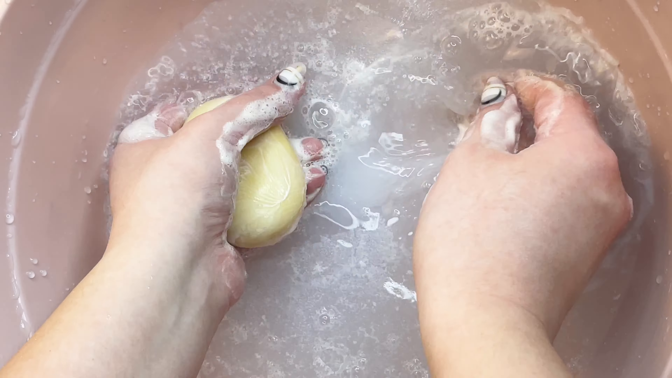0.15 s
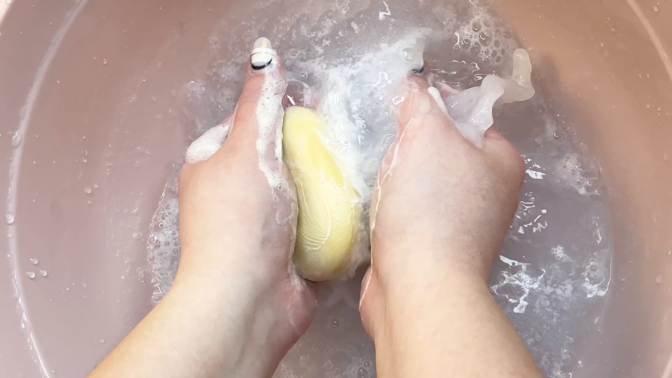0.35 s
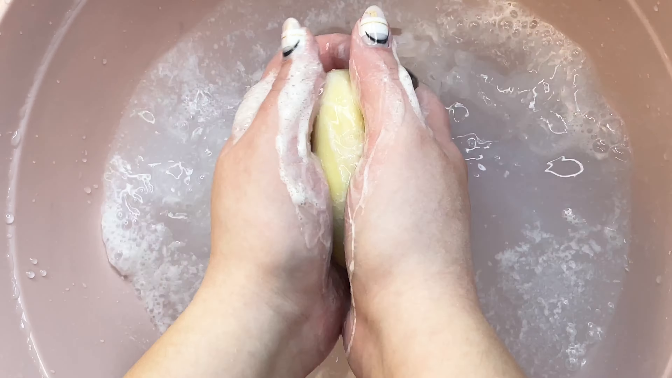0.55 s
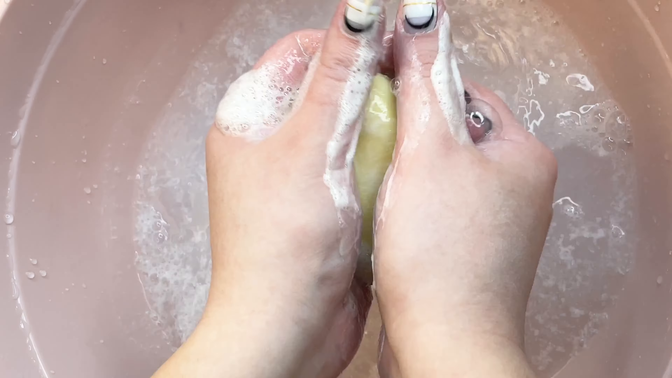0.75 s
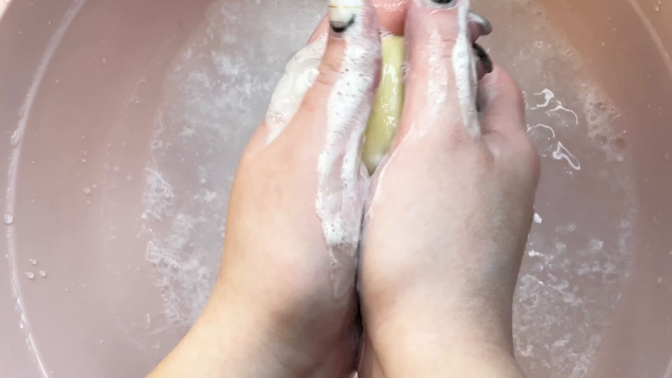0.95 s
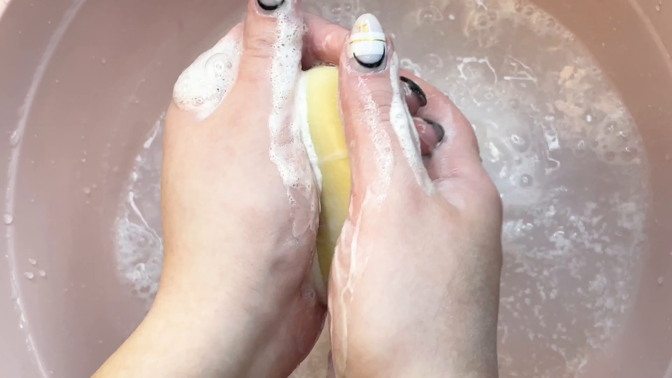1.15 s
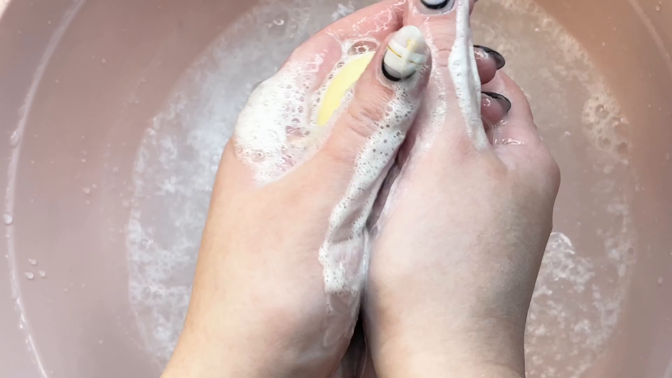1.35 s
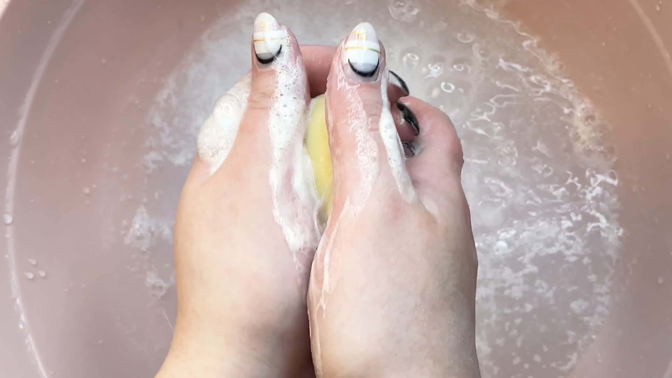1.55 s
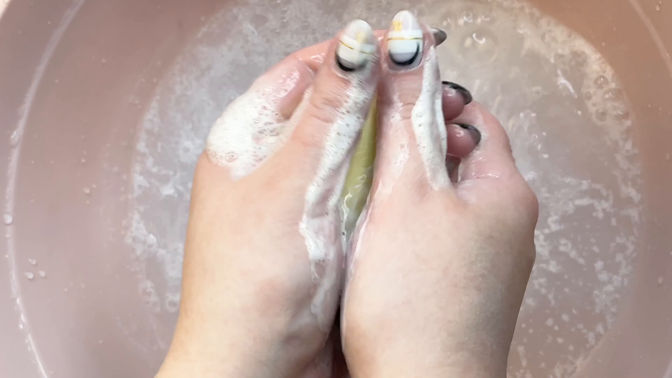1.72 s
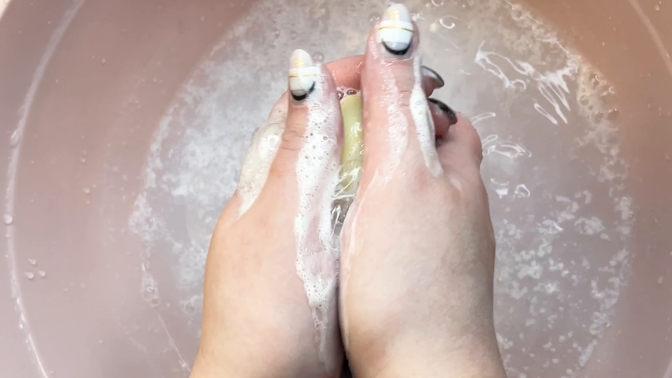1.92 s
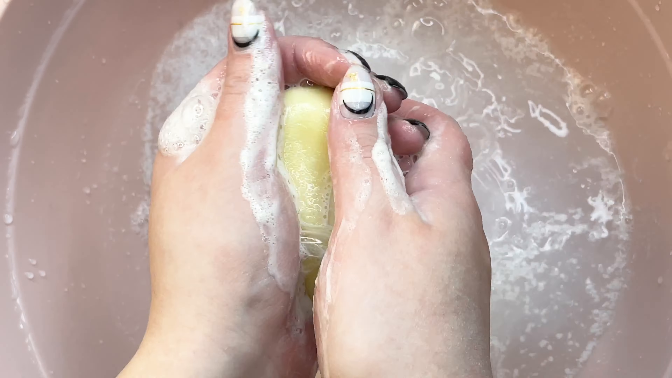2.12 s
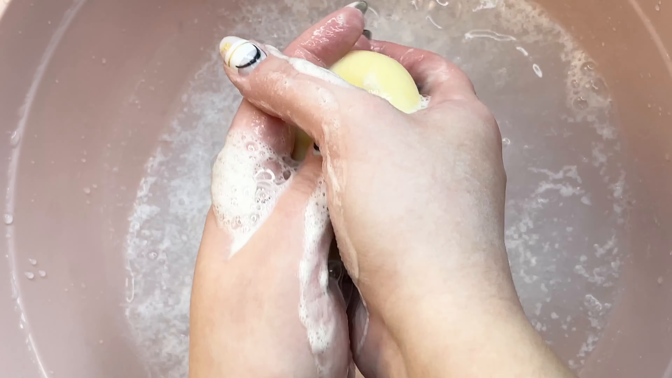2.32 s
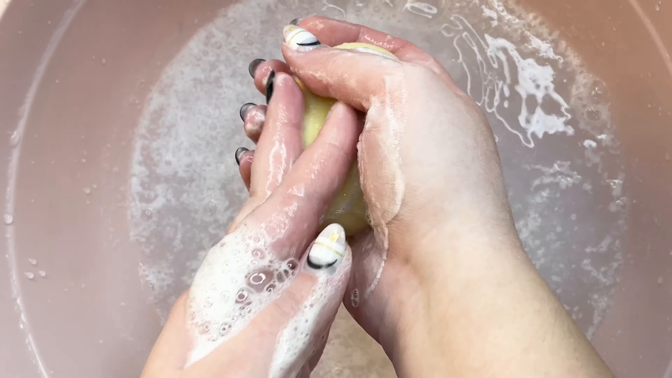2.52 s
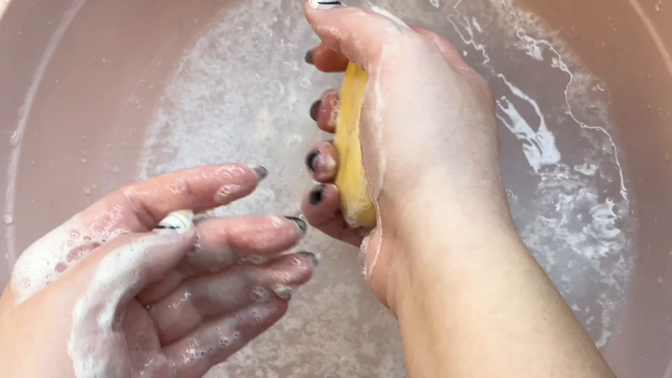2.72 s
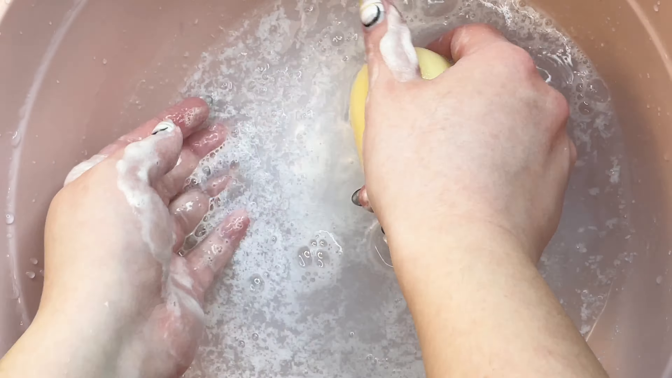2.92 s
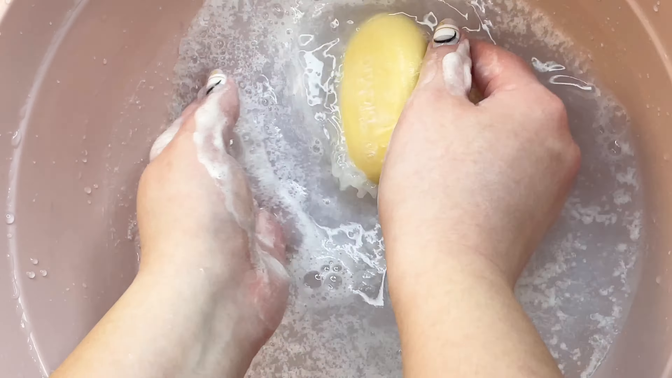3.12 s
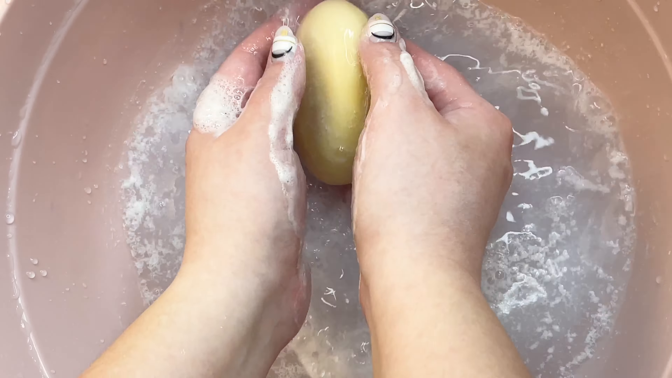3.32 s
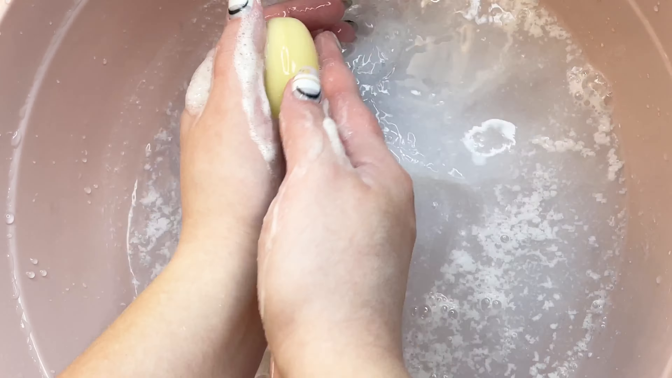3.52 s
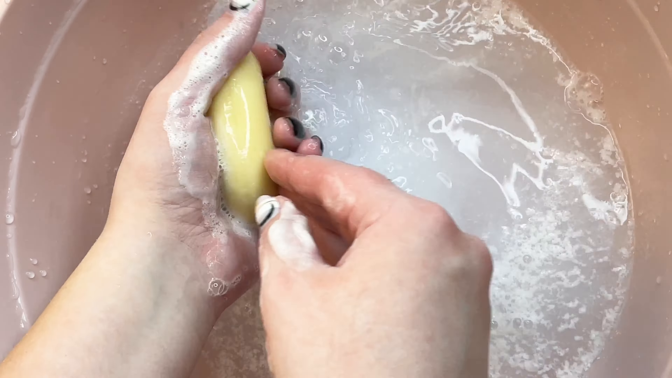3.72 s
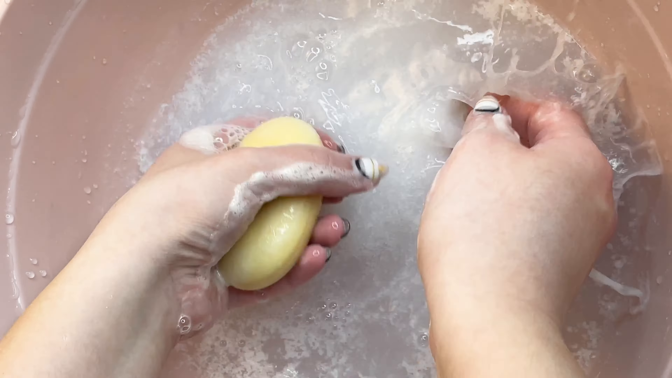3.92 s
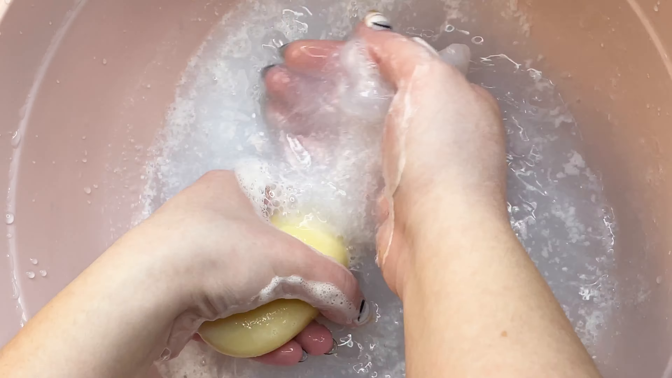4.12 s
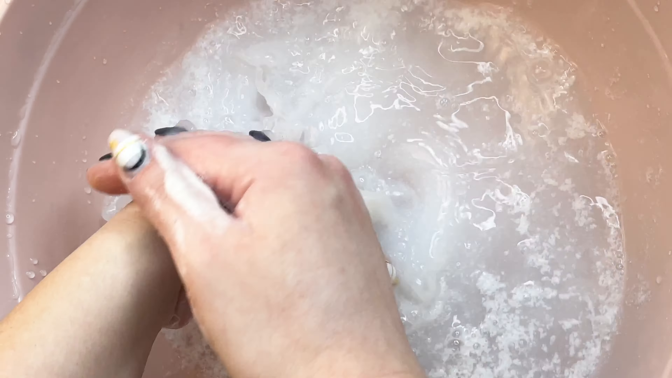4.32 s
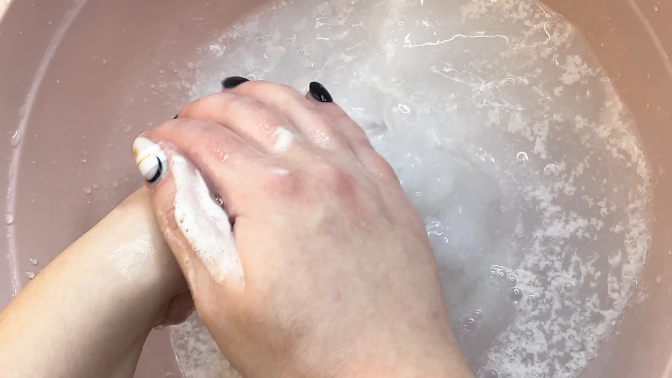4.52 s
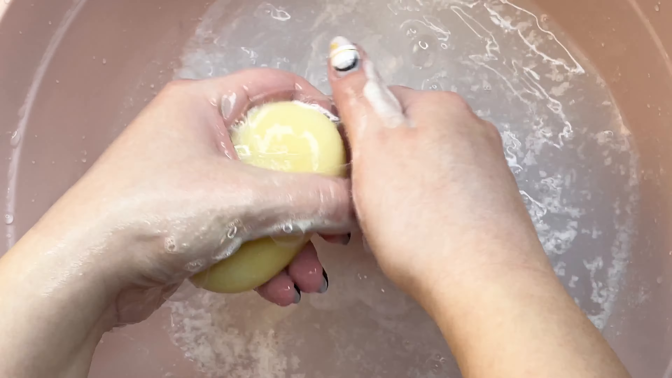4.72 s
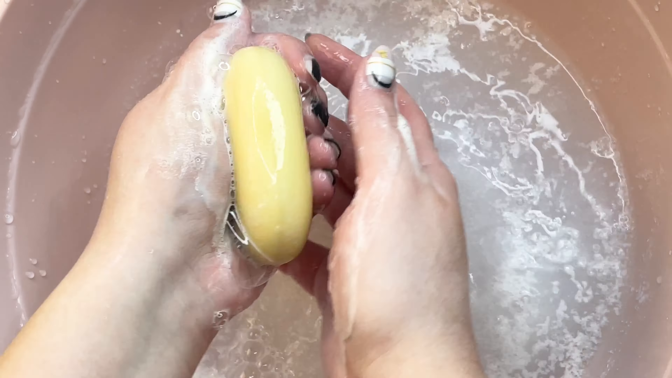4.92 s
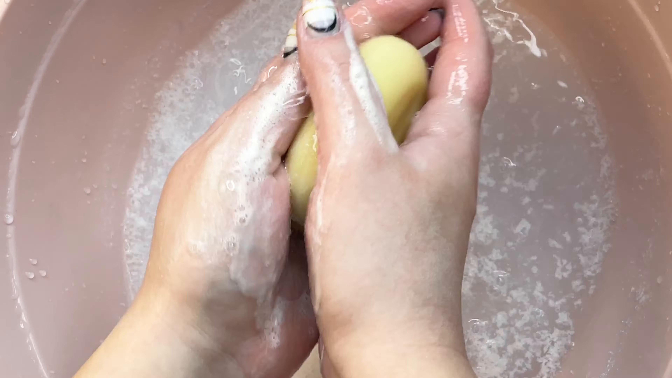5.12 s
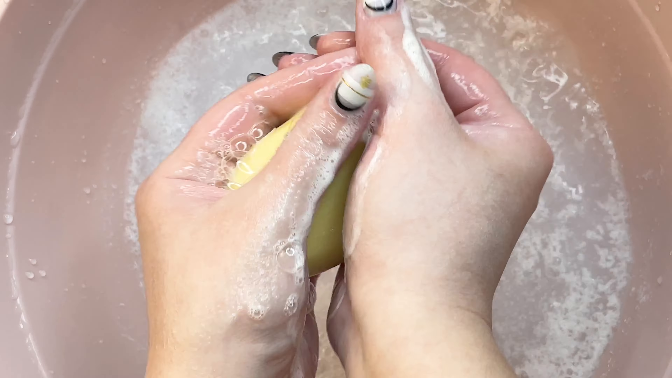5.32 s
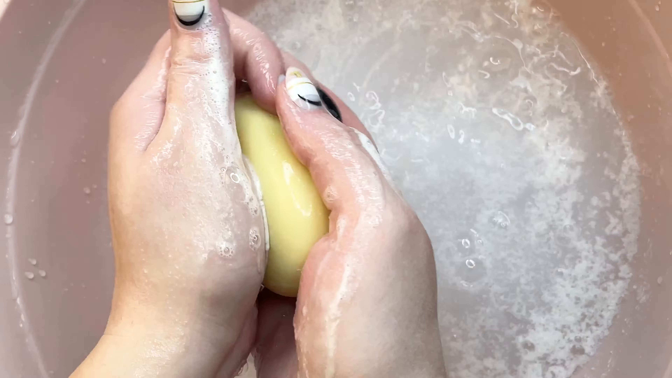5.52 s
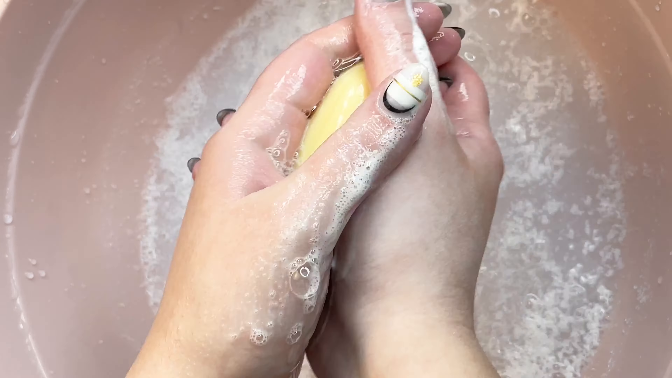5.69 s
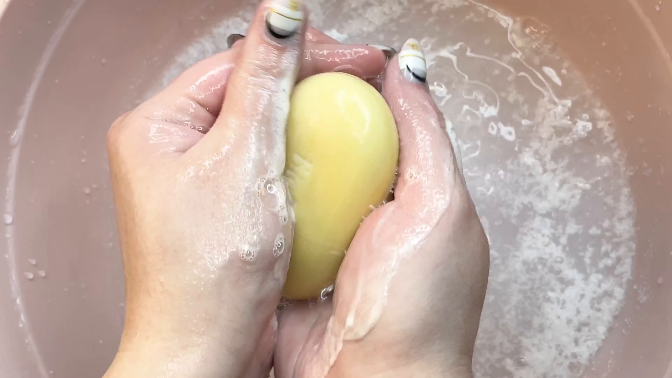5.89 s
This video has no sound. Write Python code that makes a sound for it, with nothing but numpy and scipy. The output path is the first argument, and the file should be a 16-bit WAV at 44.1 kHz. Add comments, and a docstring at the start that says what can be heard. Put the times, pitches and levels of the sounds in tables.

```python
"""Two wet hands turn a soaked bar of soap over a plastic basin of sudsy water, for about six seconds.
For the first second they squeeze briskly: suds squelch and fizz, and air pockets ring, smack and snap.
It then thins out until about 3 s, when a loud plunge rings and sinks to a gulp; another follows near 4 s.
A dense run of squelches and pops follows until 4.8 s, then sparse ones over the fizzing foam.
Throughout, water sloshes, a faint drone wavers, and basin and small room answer into a close stereo mic."""
import sys
import numpy as np
from scipy import signal
from scipy.fft import rfft, irfft, next_fast_len
from scipy.io import wavfile
from scipy.ndimage import uniform_filter1d, map_coordinates

SR = 44100
rng = np.random.default_rng(int(sys.argv[2]) if len(sys.argv) > 2 else 0)


def master_out(mix):
    """Clip the mix to full scale and print it as 16-bit PCM to the path in sys.argv[1]."""
    frames = np.transpose(np.atleast_2d(mix))
    ceiling = np.clip(frames, -1, 1)
    pcm = np.round(ceiling * 32767).astype(np.int16)
    wavfile.write(sys.argv[1], SR, pcm)


N = 262395


def amp(db):
    """Decibels to gain."""
    return 10 ** (np.asarray(db) / 20)


def unit(x):
    """Scale to rms 1."""
    return x / np.sqrt(np.mean(x ** 2) + 1e-20)


def burst(x):
    """Scale a short sound to the energy of 5 ms at rms 1."""
    return x * np.sqrt(.005 * SR / (np.sum(x ** 2) + 1e-20))


def decay(t, t60):
    """An exponential fade that loses 60 dB in t60 seconds."""
    return np.exp(-np.log(1000) * t / t60)


def along(points, hz):
    """Read (Hz, value) points on a log frequency axis."""
    f, v = np.transpose(points)
    return np.interp(np.log(hz + 1), np.log(f), v)


def level_curve(rows):
    """Join (time, level) points into one level per sample."""
    s, level_db = np.transpose(rows)
    return np.interp(np.arange(N) / SR, s, level_db)


def wobble(rate):
    """A smooth random curve, rate knots a second."""
    knots = rng.standard_normal(int(N * rate / SR) + 4)
    return map_coordinates(knots, [np.arange(N) * rate / SR])


def rise_and_fall(s, rise_s, fall_s):
    """An envelope that grows to 1 at s seconds and dies away."""
    t = np.arange(N) / SR - s
    return np.exp(np.minimum(t / rise_s, -t / fall_s))


def filtered(x, response):
    """x times a complex response of frequency."""
    m = next_fast_len(N + SR // 2)
    return irfft(rfft(x, m) * response(np.fft.rfftfreq(m, 1 / SR)), m)[..., :N]


def coloured(x, spectrum):
    """x shaped by a spectrum, at rms 1."""
    return unit(filtered(x, lambda hz: amp(along(spectrum, hz))))


def impulse(spectrum, size=512):
    """The causal impulse response that has this spectrum, by folding its cepstrum."""
    cepstrum = irfft(np.log(amp(along(spectrum, np.fft.rfftfreq(size, 1 / SR)))))
    cepstrum[1:size // 2] *= 2
    cepstrum[size // 2 + 1:] = 0
    return irfft(np.exp(rfft(cepstrum)))


def add(track, s, sound):
    """Mix a sound into the track at s seconds."""
    part = track[max(round(s * SR), 0):][:len(sound)]
    part += sound[:len(part)]


def bubble(t, hz, t60, rise, swell):
    """An air pocket swells for some cycles, then rings out; its pitch has changed by the share rise at t60."""
    glide = 1 + rise * np.minimum(t / t60, 2) / 2
    onset = 1 - np.exp(-(t * hz / swell) ** 2)
    return np.sin(2 * np.pi * hz * t * glide) * decay(t, t60) * onset


# squeezes of the lather: (time of greatest pressure [s], squelch level [dB], length [s],
# resonance of the hollow between the hands [Hz])
SQUEEZE_MOVES = [(0.058, -48.5, 0.12, 1530), (0.198, -41, 0.021, 1230), (0.236, -49, 0.069, 993),
                 (0.411, -50, 0.11, 755), (0.461, -46.5, 0.14, 1860), (0.647, -33.5, .12, 1410),
                 (0.777, -46, 0.066, 2800), (0.909, -37.5, 0.016, 1000), (1.098, -51, 0.22, 2930),
                 (1.246, -46, 0.023, 1110), (1.395, -60, 0.24, 2980), (1.616, -50, 0.028, 1110),
                 (1.706, -54.5, 0.057, 2100), (1.975, -58, 0.072, 2985), (3.085, -37, 0.068, 1385),
                 (3.173, -40, 0.041, 1500), (3.338, -46.5, 0.041, 2700), (3.441, -43.5, 0.11, 1695),
                 (3.551, -41.5, 0.04, 2360), (3.994, -39.5, 0.091, 1100), (4.142, -54, .14, 605),
                 (4.271, -46, 0.079, 3420), (4.363, -35.5, 0.082, 1813), (4.413, -35, 0.062, 1697),
                 (4.53, -39, 0.13, 2640), (4.735, -43, 0.089, 2718), (5.011, -50.5, 0.05, 1310),
                 (5.295, -59.5, 0.041, 1896), (5.723, -59.5, 0.08, 1682)]
PRESS_SHARE = .4  # part of a squeeze's length that sets its build-up
REST_DB, REST_HZ = -73.5, 2600  # squelch and hollow of the resting hands
HOLLOW_RISE_OCTAVES = 0.18  # the hollow climbs from this far below to this far above its pitch


def pressure():
    """How hard the hands work the lather, in dB of squelch, and the pitch of the closing hollow between them."""
    t = np.arange(N) / SR
    power = np.full(N, amp(REST_DB) ** 2)
    # each squeeze pulls the pitch by its share of the power
    pitch = power * np.log2(REST_HZ)
    for s, db, length, hz in SQUEEZE_MOVES:
        squeeze = rise_and_fall(s, PRESS_SHARE * length, (1 - PRESS_SHARE) * length)
        part = (amp(db) * squeeze) ** 2
        closing = HOLLOW_RISE_OCTAVES * np.clip((t - s) / length, -1, 1)
        power = power + part
        pitch = pitch + part * (np.log2(hz) + closing)
    return 10 * np.log10(power), 2 ** (pitch / power)


HOLLOW_OCTAVES = 0.88  # from the resonance's centre to half power


def hollow(x, hollow_hz):
    """The cupped hands colour x with one broad, moving resonance and keep its level."""
    hz, t, z = signal.stft(x, SR, nperseg=256)
    centre_hz = np.interp(t * SR, np.arange(N), hollow_hz)
    octaves = np.log2((hz[:, None] + 1) / centre_hz)
    boost = 1 / (1 + (octaves / HOLLOW_OCTAVES) ** 2)
    power = np.mean(np.abs(z) ** 2, axis=1, keepdims=True)
    gain = np.sqrt(boost / np.sum(boost * power, axis=0))
    return unit(signal.istft(z * gain, SR, nperseg=256)[1][:N])


def grains(count, centre_hz, spread, cycles, scatter_db, size):
    """Many tiny bubbles at random moments, of random pitch and strength, evened out in spectrum."""
    when, pitch, strength = rng.random((3, count, 1))
    hz = np.clip(centre_hz * (pitch / (1 - pitch)) ** spread, 300, 15000)
    t = np.arange(size) / SR
    gain = amp(scatter_db * np.minimum(-np.log(1 - strength), 3.5))
    rings = gain * bubble(t, hz, np.minimum(cycles / hz, size / SR), rise=.2, swell=1)
    starts = np.floor(when * N).astype(int)
    cloud = np.bincount((starts + np.arange(size)).ravel(), rings.ravel(), N + size)[:N]
    # even out the spectrum, so that the lather alone sets the colour
    z = rfft(cloud)
    power = np.abs(uniform_filter1d(np.abs(z) ** 2, size=2001))
    return unit(irfft(z / np.sqrt(power + power.max() / 10 ** 4), N))


# colour of the mid-sized bubbles that squelch: (frequency [Hz], relative density [dB per Hz])
SQUELCH_COLOUR = [(150, -4.5), (400, -2), (600, -3.5), (900, -4.5), (1500, -2.5), (2800, 0), (5000, -3.5),
                  (8000, -11.5), (16000, -24.5)]
# colour of the foam's fine fizz: (frequency [Hz], relative density [dB per Hz])
FIZZ_COLOUR = [(500, -42.5), (1300, -44), (2500, -4), (4500, 6), (6000, 7.5), (8500, 6.5), (11000, 5),
               (13500, 2), (15500, 10.5), (16400, -18.5)]
# colour of single foam bubbles: (frequency [Hz], relative density [dB per Hz])
TICK_COLOUR = [(600, -35), (1500, -7.5), (3000, -9), (5000, 2), (8000, -21.5), (16000, -25.5)]
# the foam's own fizz, to which squeezing adds: (time [s], level [dB])
FOAM_LEVEL = [(0, -53), (.2, -66), (.5, -59), (.7, -55), (1.1, -52), (1.6, -53), (1.9, -57), (2.6, -62.5),
              (2.85, -65.5), (3.02, -58), (3.27, -60.5), (3.45, -61), (3.85, -56.5), (4.2, -55),
              (4.48, -44.5), (4.75, -58), (5.15, -55), (5.95, -63)]
STIRRED_FIZZ_DB = -12  # extra fizz against the squelch
TICK_DB = -9.5  # single bubbles against the fizz


def lather(press_db, hollow_hz):
    """Squeezed suds: clumps of mid-sized bubbles squelch over the fine fizz and single ticks of bursting foam."""
    medium = grains(count=4600, centre_hz=1700, spread=.44, cycles=21, scatter_db=3.8, size=900)
    tiny = grains(count=34000, centre_hz=6500, spread=.38, cycles=14, scatter_db=2.8, size=140)
    single = grains(count=420, centre_hz=3200, spread=.3, cycles=20, scatter_db=4.5, size=600)
    squelch = amp(press_db + wobble(50)) * hollow(coloured(medium, SQUELCH_COLOUR), hollow_hz)
    fizz_level = np.hypot(amp(level_curve(FOAM_LEVEL)), amp(press_db + STIRRED_FIZZ_DB))
    fizz = amp(0.61 * wobble(40)) * coloured(tiny, FIZZ_COLOUR)
    ticks = amp(TICK_DB) * coloured(single, TICK_COLOUR)
    return squelch + fizz_level * (fizz + ticks)


def noise_break(colour, t60, swell_db):
    """A noise burst of uneven little steps swells over 10 ms, then breaks and fades."""
    t = np.arange(2048) / SR - .01
    after = np.maximum(t, 0)
    swelling = amp(swell_db) * np.exp(-np.abs(t) / 0.0028)
    release = decay(after, t60) * (1 - np.exp(-after / 0.00044))
    steps = rng.standard_normal(len(t)) * amp(0.52 * rng.standard_normal(len(t)))
    noise = steps * (swelling + release / release.max())
    return burst(signal.fftconvolve(noise, impulse(colour)))


def spray(centre_hz, octaves, spread_s, cycles, count):
    """A handful of small bubbles that break at random moments, the later ones tending weaker."""
    cluster, t = np.zeros(2048), np.arange(1024) / SR
    for when, pitch, strength in rng.random((count, 3)):
        hz = min(centre_hz * 2 ** (octaves * (pitch - .5)), SR / 3)
        ring = bubble(t, hz, min(cycles / hz, len(t) / SR), rise=.4, swell=1.0)
        add(cluster, spread_s * when, amp(-7 * strength - 23 * when) * burst(ring))
    return burst(cluster)


# colour of a pocket's wall slapping shut: (frequency [Hz], relative density [dB per Hz])
SLAP_COLOUR = [(100, -37.5), (260, -5.5), (400, -7.5), (600, -2.5), (950, -2), (1500, -3.5), (4000, -75)]
# colour of the wall's smack: (frequency [Hz], relative density [dB per Hz])
SMACK_COLOUR = [(400, -7), (900, -34.5), (1400, 2.5), (2800, 9.5), (5000, 4.5), (7000, -0.5),
                (14000, -46.5)]
# colour of the thin film's snap: (frequency [Hz], relative density [dB per Hz])
SNAP_COLOUR = [(2500, -25.5), (4500, 3), (6000, -1.5), (8500, 1.5), (11000, -1.5), (16000, -10.5)]
RING_T60_S, RING_SHORTENS = 0.018, 0.62  # ring of a 1 kHz pocket; power by which higher ones die sooner
SLAP_DB, SNAP_DB = -14.5, -11.5  # against the pocket's strength, at brightness 0


def pocket(db, hz, tone_db, bright_db):
    """A pocket's cavity rings, 10 ms in; its wall slaps shut, smacks into small bubbles and snaps as a thin film."""
    sound, t = np.zeros(2560), np.arange(2048) / SR
    ring_db, smack_db = db + tone_db / 2, db - tone_db / 2
    t60 = RING_T60_S * (10 ** 3 / hz) ** RING_SHORTENS
    ring = amp(ring_db) * burst(bubble(t, hz, t60, rise=.16, swell=1.3))
    neighbours = amp(ring_db - 13) * spray(hz, octaves=.8, spread_s=.02, cycles=41, count=3)
    # a large pocket breaks into larger, lower bubbles
    fragments = spray(48 * np.sqrt(hz), octaves=1.836, spread_s=.004, cycles=16.3, count=5)
    smack = amp(smack_db - 2.5) * fragments
    # brightness trades slap for snap
    slap = amp(db + SLAP_DB - bright_db) * noise_break(SLAP_COLOUR, t60=0.054, swell_db=-6.0)
    wall_smack = amp(smack_db - 5.0) * noise_break(SMACK_COLOUR, t60=0.011, swell_db=-1.5)
    snap = amp(db + SNAP_DB + bright_db) * noise_break(SNAP_COLOUR, t60=0.011, swell_db=-20)
    # the noise swells before the ring; the neighbours may begin up to 5 ms ahead of it
    add(sound, 0, slap + wall_smack + snap)
    add(sound, .005, neighbours)
    add(sound, .01, ring + smack)
    return sound


# the larger air pockets: (time [s], strength [dB], ring [Hz], ring over smack [dB], brightness [dB],
# number of bursts [count])
AIR_POCKETS = [(0.0389, -31, 1820, -1, -5.5, 2), (0.123, -49, 1200, 7, 12.5, 1),
               (0.1756, -25, 2380, -3.5, -8.5, 1), (.271, -52, 2450, -10, -16, 1),
               (.342, -41, 2920, -7, -13, 1), (0.376, -43.5, 3180, 6, 11, 1),
               (0.394, -45.5, 815, 10, -19.5, 1), (0.426, -33.5, 3350, 3.5, 11, 1),
               (0.445, -45, 5370, 2, 11, 1), (0.469, -36, 3580, -6, 7, 1), (0.5002, -31.5, 2520, 7, 1.5, 1),
               (0.5358, -34.5, 4160, 6.5, 3.5, 1), (0.5563, -38.5, 1630, 5, 0, 1),
               (0.579, -33.5, 578, -1.5, 9, 1), (0.594, -37.5, 3053, 4, 22.5, 1),
               (.607, -42, 706, 5, -24.5, 2), (.633, -37.5, 1290, 13, -3, 1), (0.6394, -40, 3950, 8, 20, 1),
               (0.6663, -29, 1215, 6, 3.5, 1), (.708, -40, 600, 3, 1, 1), (0.7126, -40.5, 1630, 16, -5, 1),
               (.769, -43.5, 3080, 7, 0, 1), (0.8242, -34.5, 3400, -6, -4.5, 1),
               (0.8887, -32, 663, 1.5, -4, 1), (.899, -36.5, 1494, 16.5, -14, 1),
               (0.9006, -35, 2000, 19, -6, 1), (.975, -49, 610, 3, -6, 1),
               (1.029, -23.5, 1600, 8.5, -3.5, 2), (1.078, -35, 3560, 0, 10.5, 1),
               (1.101, -38.5, 1700, 7.5, -4, 3), (1.171, -48, 2664, 7, 6, 1), (1.2155, -48, 2170, 20, 3, 1),
               (1.246, -41, 1820, 9.5, -16.5, 1), (1.267, -43.5, 3800, -4.5, -3, 1),
               (1.34, -43.5, 3160, 0.5, 3, 1), (1.3651, -40.5, 2220, 3.5, 3, 1),
               (1.376, -41, 3290, 1, 6, 1), (1.585, -51, 755, -5, 18, 1), (1.601, -33, 2630, -5.5, 1, 2),
               (1.607, -54, 1260, 14, -4, 1), (1.628, -59.5, 1230, 3, -21, 1),
               (1.7012, -40.5, 1510, 2.5, 0.5, 2), (1.7587, -50.5, 2930, 16, 1, 1),
               (1.776, -57, 770, -8.5, -19.5, 1), (1.919, -41.5, 2560, -12.5, 2.5, 2),
               (1.9794, -54.5, 1980, -17, -7, 1), (2.114, -43, 1830, 3, -4, 1),
               (2.148, -53.5, 4200, -8, -1, 1), (2.196, -52.5, 5860, -3.5, 21.5, 1),
               (2.272, -62, 3800, 8, 7, 1), (2.4779, -51, 3150, 2, 8, 1), (2.556, -61.5, 4290, 15, 18, 1),
               (2.654, -48, 3720, -2.5, 7, 1), (2.7892, -53, 2088, -7, 8, 1),
               (2.83, -52.5, 1066, -9, -10.5, 1), (2.9748, -48, 5830, 4, 5, 1),
               (3.016, -42.5, 4390, 3, 3, 1), (3.0292, -32.5, 1570, -1.5, -4, 1),
               (3.0458, -33, 1594, -3.5, -5, 3), (3.057, -33, 1590, 6, -9, 1), (3.07, -30, 3070, -5, -3, 1),
               (3.078, -19, 1780, -5.5, -7, 1), (3.091, -21.5, 1375, -0.5, -7, 1),
               (3.1347, -30, 3630, -6, 3, 2), (3.155, -30, 1290, -12.5, 10.5, 2),
               (3.2939, -42.5, 4590, 10, 2, 1), (3.3203, -42, 1900, -9, 2, 1),
               (3.3605, -38.5, 1450, 5, -1, 2), (3.415, -53, 1660, 11, -3, 2), (3.44, -47, 5400, 0, 7, 1),
               (3.478, -49, 5030, -2, 20.5, 1), (3.5045, -50.5, 2250, 16, -1, 1),
               (3.5235, -43, 1423, 2, 2, 1), (3.5364, -35.5, 650, 0.5, 2.5, 1),
               (3.5436, -37.5, 1900, 15.5, -7, 1), (3.549, -42, 2600, 12, -11, 2),
               (3.6698, -41, 2840, -4.5, 4, 1), (3.784, -45.5, 2375, 7, -0.5, 1),
               (3.829, -41, 1014, 3.5, -13, 1), (3.934, -35.5, 3990, 9, 19.5, 1),
               (3.9439, -33.5, 3050, 4, 19.5, 1), (3.972, -26, 1840, -4, -7.5, 1),
               (3.9881, -26, 1887, 3, -10, 1), (4.0049, -43.5, 690, 15, 25, 1),
               (4.068, -41.5, 2430, -6, 4, 1), (4.079, -45.5, 3064, 6, -1, 1),
               (4.099, -44.5, 1840, -1, -8, 1), (4.236, -39.5, 4826, 2, 11, 1),
               (4.2983, -33.5, 2330, -9, 4.5, 1), (4.3371, -34.5, 2090, 5, 12.5, 1),
               (4.3609, -35.5, 2386, -5, 5, 1), (4.3821, -27.5, 4510, 4.5, 4, 1),
               (4.4087, -37.5, 900, 1, 16.5, 1), (4.438, -36.5, 3180, -5, 18.5, 1),
               (4.514, -39.5, 2322, -15, 16, 1), (4.538, -33, 2560, -2, 5, 1), (4.546, -31, 1556, 10, 4, 1),
               (4.5871, -38.5, 2150, 11, 12, 1), (4.659, -44, 4440, -15, 16.5, 1),
               (4.667, -40, 2514, -2, -3, 1), (4.708, -38.5, 3800, -7, 23, 2),
               (4.7334, -37, 1660, -6, 11, 1), (4.7509, -34.5, 1417, 4, 5, 1),
               (4.7828, -48, 2140, 19, -6, 1), (4.809, -46.5, 2950, -1, 1, 1),
               (4.967, -50.5, 3274, -8.5, 10, 1), (4.991, -45, 1800, 9, 2, 1),
               (5.0067, -42, 1860, 9, -9.5, 2), (5.172, -52.5, 3047, 0.5, 12, 1),
               (5.225, -57.5, 3273, 20, -2, 1), (5.4515, -41.5, 3520, -5, 2.5, 2),
               (5.585, -46.5, 5290, -4, 4.5, 1), (5.672, -48, 1540, 1, -1, 1),
               (5.6773, -40, 1804, 4.5, -3, 2), (5.729, -53.5, 1806, 4, 13, 1),
               (5.8026, -39, 2152, 0, -9, 1), (5.824, -46.5, 448, 10, -3, 1), (5.833, -35, 3550, -1, -6, 2),
               (5.844, -34.5, 3610, -10, -2.5, 1), (5.929, -53, 3270, 39.5, 12, 1)]
# a pocket that empties in steps: each is later, weaker, lower (pitch as a ratio)
BURST_GAP_S, BURST_LOSS_DB, BURST_PITCH = .007, 6, 0.97


def pops():
    """Each larger pocket empties in one burst or a quick run of them."""
    track = np.zeros(N)
    for s, db, hz, tone_db, bright_db, bursts in AIR_POCKETS:
        for k in range(round(bursts)):
            sound = pocket(db - k * BURST_LOSS_DB, hz * BURST_PITCH ** k, tone_db, bright_db)
            add(track, s + k * BURST_GAP_S - .01, sound)  # start early: the ring comes 10 ms in
    return track


STRAY_IDLE_PER_S, STRAY_BUSY_PER_S = 3, 40  # limits of the rate from no pressure to the hardest
BUSY_DB = -44  # squelch level at which the hands are half busy
# strength at BUSY_DB; its growth in dB per dB of squelch; its random spread
STRAY_DB, STRAY_GROWS, STRAY_SCATTER_DB = -50, 0.45, 0.5
STRAY_OVER_HOLLOW, STRAY_OCTAVES = 1.8, 0.55  # middle pitch as a ratio to the hollow's; its random spread
STRAY_TONE_DB, STRAY_BRIGHT_DB = 5, -0.5  # average ring over smack; average brightness


def strays(press_db, hollow_hz):
    """Small pockets burst at random, thicker and louder under pressure."""
    track = np.zeros(N)
    busy = 1 / (1 + amp(BUSY_DB - press_db))
    # running count of bursts that are due
    due = np.cumsum(STRAY_IDLE_PER_S + (STRAY_BUSY_PER_S - STRAY_IDLE_PER_S) * busy) / SR
    chances, draws = rng.random(size=200), rng.standard_normal(size=(200, 4))
    for k, (chance, (strength, pitch, tone, bright)) in enumerate(zip(chances, draws)):
        n = np.searchsorted(due, k + chance)
        if n < N:
            db = STRAY_DB + STRAY_GROWS * (press_db[n] - BUSY_DB) + STRAY_SCATTER_DB * strength
            hz = hollow_hz[n] * STRAY_OVER_HOLLOW * 2 ** (STRAY_OCTAVES * pitch)
            sound = pocket(db, hz, STRAY_TONE_DB + 4 * tone, STRAY_BRIGHT_DB + 3 * bright)
            add(track, n / SR, sound)
    return track


GURGLES_PER_S = 130  # chains a second that the hardest pressure approaches
GURGLE_DB = -9  # first bubble of a chain against the squelch
GURGLE_OCTAVES, GURGLE_GLIDE = .5, .3  # random spread of pitch; scale of the glide as a share of pitch
LINK_GAP_S, LINK_PITCH, LINK_LOSS_DB = 0.0099, 1.1, 4.5  # average gap, pitch ratio and loss per link


def gurgle(press_db, hollow_hz):
    """Water forced between the fingers: short chains of soft, gliding bubbles, each higher and weaker."""
    track, t = np.zeros(N), np.arange(2048) / SR
    # running count of chains that are due
    due = np.cumsum(GURGLES_PER_S / (1 + amp(BUSY_DB - press_db) ** 2)) / SR
    chances, draws = rng.random(size=200), rng.standard_normal(size=(200, 2))
    for k, (chance, (pitch, glide)) in enumerate(zip(chances, draws)):
        n = np.searchsorted(due, k + chance)
        if n < N:
            rise = GURGLE_GLIDE * (.5 + np.tanh(glide))
            for link in range(3):
                hz = hollow_hz[n] * 2 ** (GURGLE_OCTAVES * pitch) * LINK_PITCH ** link
                ring = burst(bubble(t, hz, t60=40 / hz, rise=rise, swell=2))
                gain = amp(press_db[n] + GURGLE_DB - link * LINK_LOSS_DB)
                add(track, n / SR + link * LINK_GAP_S * (.5 + chance), gain * ring)
    return track


# clean-ringing bubbles under the hands: (time [s], level [dB], pitch [Hz], t60 [s],
# glide [share of the pitch])
GLUG_BUBBLES = [(.607, -41.5, 1225, .045, .15), (.632, -37.5, 1310, 0.026, 0.3),
                (0.669, -34.5, 1340, 0.031, 0.096), (.683, -37, 1964, .05, 0.16),
                (.903, -38, 635, 0.042, 0.76), (1.032, -35, 592, .045, .05),
                (1.042, -28, 1670, 0.0223, 0.31), (3.236, -40.5, 331, .12, -.75),
                (3.3597, -28, 1180, 0.043, 0.19), (3.434, -48, 288, .1, -0.15),
                (4.007, -37, 483, .066, -0.16), (4.103, -48.5, 302, 0.097, -0.13),
                (4.298, -34, 1520, 0.06, .3), (4.328, -33, 970, .05, 0.6), (4.339, -30, 2070, 0.03, 0.019),
                (4.362, -31, 2077, 0.034, -.3), (4.369, -39, 1450, 0.023, .2),
                (4.391, -36, 663, 0.053, 0.43), (4.406, -29, 1810, 0.036, .15),
                (4.442, -31, 3145, 0.022, .03), (4.993, -43, 990, 0.036, -0.16),
                (5.684, -34, 1795, 0.015, -0.18), (5.779, -51, 610, 0.023, -0.25)]


def glugs():
    """Large pockets of air wobble under the water; their pitch glides as they shrink or open."""
    track, t = np.zeros(N), np.arange(SR // 4) / SR
    for s, db, hz, t60, rise in GLUG_BUBBLES:
        add(track, s, amp(db) * burst(bubble(t, hz, t60, rise, swell=1)))
    return track


# the hands or the bar plunge into the water: (time [s], level [dB])
PLUNGE_HITS = [(.176, -41), (3.074, -31), (3.153, -38.5), (3.538, -48), (3.973, -37.5)]
# modes of a plunge's cavity, high at once, then low as it deepens:
# (starting pitch [Hz], level against the plunge [dB], rise [s], t60 [s])
CAVITY_MODES = [(633, -0.5, .002, 0.085), (281.4, -.5, .02, 0.21)]
CAVITY_WAVER = .9  # unsteadiness of the ring's phase [radians]
CAVITY_SINK_PER_S = 2.2  # share of the starting pitch lost per second


def plunges():
    """A plunge opens a cavity in the water, whose unsteady ring sinks to a low gulp."""
    track, t = np.zeros(N), np.arange(SR // 4) / SR
    for s, db in PLUNGE_HITS:
        for hz, mode_db, rise_s, t60 in CAVITY_MODES:
            envelope = (1 - np.exp(-(t / rise_s) ** 2)) * decay(t, t60)
            cycles = hz * t * (1 - CAVITY_SINK_PER_S * t / 2)
            waver = CAVITY_WAVER * wobble(hz / 4)[:len(t)]
            ring = np.sin(2 * np.pi * cycles + waver)
            add(track, s, amp(db + mode_db) * burst(envelope * ring))
    return track


# colour of the moving water: (frequency [Hz], relative density [dB per Hz])
WATER_COLOUR = [(20, -20), (35, -16), (58, 2), (88, -1.5), (125, 0.5), (170, -1), (270, -3.5), (400, -18),
                (900, -43.5), (3000, -58)]
# the hands push the water: (time [s], level [dB])
SLOSH_PUSHES = [(.01, -49.5), (0.212, -47), (.63, -48), (1.12, -57.5), (3.15, -47.5), (3.55, -64),
                (4.02, -45), (5.72, -59), (5.9, -57.5)]
SLOSH_RISE_S, SLOSH_FALL_S = 0.058, 0.05
RIPPLE_DB, RIPPLE_FALL_S = -9, 0.98  # ripples against the push they follow
STILL_DB = -75  # water at rest


def water():
    """Each push raises a low swash that settles into ripples, nearly alike in both channels."""
    power = amp(STILL_DB) ** 2
    for s, db in SLOSH_PUSHES:
        swash = rise_and_fall(s, SLOSH_RISE_S, SLOSH_FALL_S)
        ripples = amp(RIPPLE_DB) * rise_and_fall(s, SLOSH_RISE_S, RIPPLE_FALL_S)
        power = power + amp(db) ** 2 * (swash ** 2 + ripples ** 2)
    middle, side = coloured(rng.standard_normal((2, N)), WATER_COLOUR)
    stereo = middle + amp(-20.5) * np.array([side, -side])
    return np.sqrt(power) * amp(1.9 * wobble(18)) * stereo


# ring of the basin: (centre [Hz], width [Hz], relative level [dB])
BASIN_MODES = [(302.7, 13, 14.5), (561, 130, 13.5), (1176, 80, -32), (1480, 100, -21)]


def basin(x):
    """The plastic bowl rings in a few resonant modes."""
    def modes(f):
        return sum(amp(db) * 1j * f * w / (c * c - f * f + 1j * f * w) for c, w, db in BASIN_MODES)
    return filtered(x, modes)


# how long the room rings: (frequency [Hz], t60 [s])
ROOM_DECAY = [(230, 0.47), (700, 0.16), (4000, 0.13), (14000, 0.069)]


def room(x):
    """A short, diffuse tail of fading noise, different in each channel and for each quarter second of sound."""
    out = np.zeros((2, N + SR))
    for start in range(0, N, SR // 4):
        hz, t, z = signal.stft(rng.standard_normal((2, SR // 3)), SR, nperseg=256)
        fade = decay(t, along(ROOM_DECAY, hz)[:, None])
        tail = signal.istft(z * fade, SR, nperseg=256)[1]
        tail = tail / np.linalg.norm(tail[0])
        answer = signal.fftconvolve(x[None, start:start + SR // 4], tail, axes=1)
        # the answer comes 2.5 ms late
        out[:, start + SR // 400:][:, :answer.shape[1]] += answer
    return out[:, :N]


# a faint low drone in the room: (time [s], level [dB])
DRONE_LEVEL = [(0, -61), (1.5, -76.5), (2.1, -72), (2.75, -86), (4.4, -57.5), (4.9, -64.5), (5.4, -63.5),
               (5.95, -61)]
# the drone's two tones: (pitch [Hz], level against the drone [dB])
DRONE_TONES = [(116, -19), (166, -1)]


def background():
    """A drone of two tones, wavering in level and phase, and the faint air of the room as coloured noise."""
    t = np.arange(N) / SR
    drone = np.zeros(N)
    for hz, db in DRONE_TONES:
        tone = unit(np.sin(2 * np.pi * hz * t + 1.5 * wobble(18)))
        drone += amp(db + 3 * wobble(12)) * tone
    # (frequency [Hz], relative density [dB per Hz])
    air_colour = [(30, -40.0), (95, -14), (150, 0.0), (400, 5.5), (1000, -2), (4000, -51.0), (16000, -73.5)]
    air, side = coloured(rng.standard_normal((2, N)), air_colour)
    wide_air = air + amp(5.5) * np.array([side, -side])
    return amp(level_curve(DRONE_LEVEL)) * drone + amp(-79.0) * wide_air


def scene():
    """Hands and basin in the middle, the room around them, water and background below."""
    press_db, hollow_hz = pressure()
    hands = lather(press_db, hollow_hz) + gurgle(press_db, hollow_hz) + strays(press_db, hollow_hz)
    hands = hands + pops() + glugs() + plunges()
    near = hands + amp(-16.0) * basin(hands)
    middle, side = room(near)
    width = amp(-18) * side
    below = water() + background()
    return near + below + amp(-12) * middle + np.array([width, -width])


# phase between the microphone's channels: (frequency [Hz], lead of the left [radians])
CHANNEL_LEAD = [(100, 0), (1000, -.3), (1700, 0), (2600, .75), (4500, .85), (4800, 0), (5300, .1),
                (7500, 3.1), (10500, 6.2), (11600, 6.4), (14300, 9.4), (15700, 10.5)]
TOP_HZ = 16300  # half-power point of the steep band limit


def record(dry):
    """The microphone turns the phase between its channels and cuts steeply above its band limit."""
    def turn(hz):
        lead = np.interp(hz, *np.transpose(CHANNEL_LEAD))
        return np.exp(1j * np.outer([1, -1], lead) / 2)
    turned = filtered(dry, turn)
    return filtered(turned, lambda hz: 1 / np.sqrt(1 + (hz / TOP_HZ) ** 160))


dry = scene()
out = record(dry)
master_out(out)
```